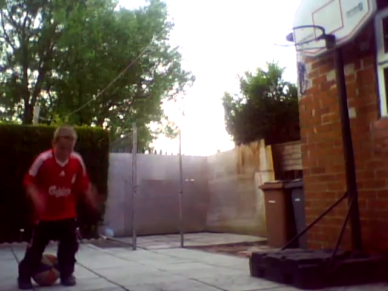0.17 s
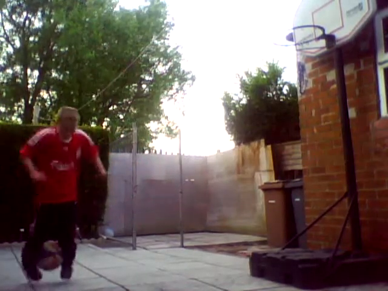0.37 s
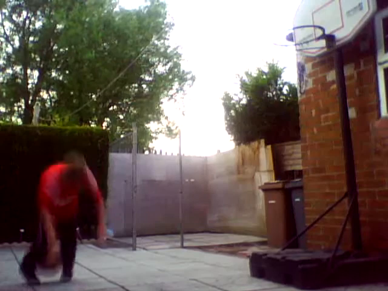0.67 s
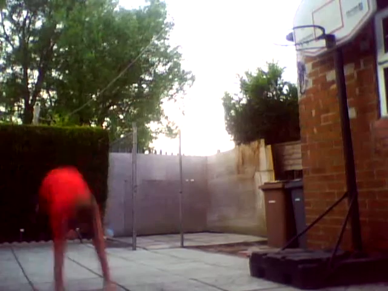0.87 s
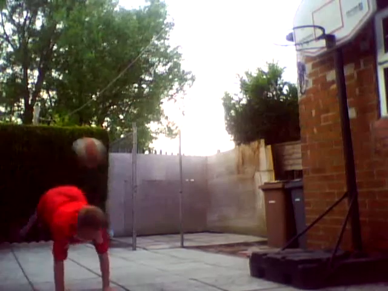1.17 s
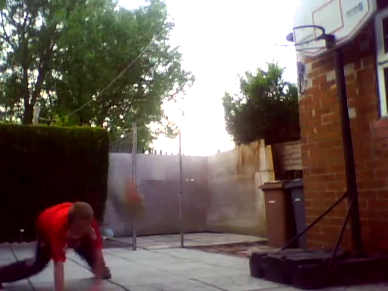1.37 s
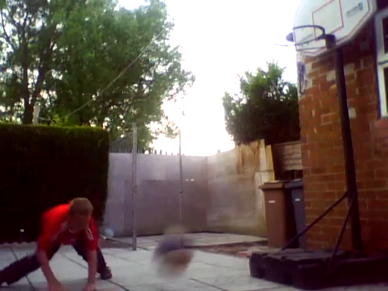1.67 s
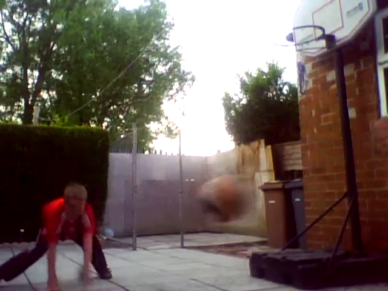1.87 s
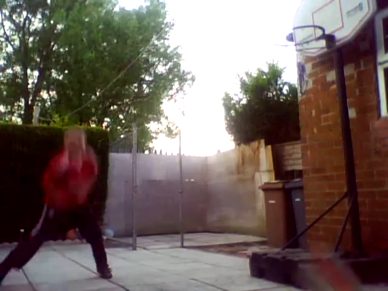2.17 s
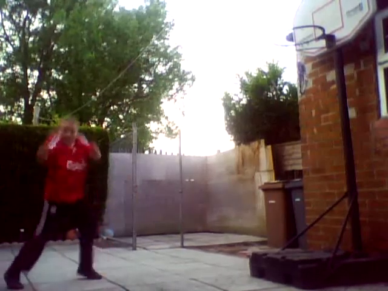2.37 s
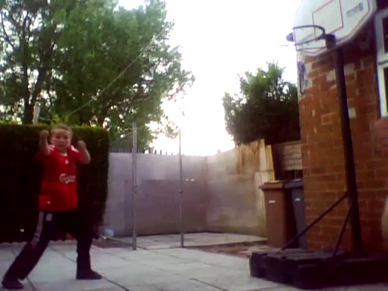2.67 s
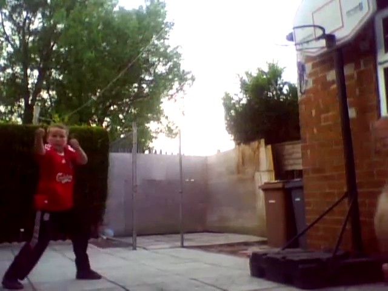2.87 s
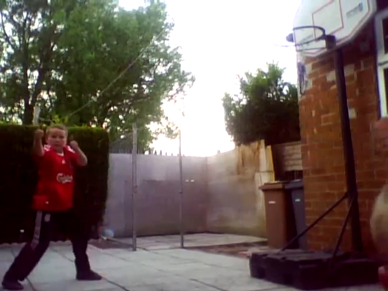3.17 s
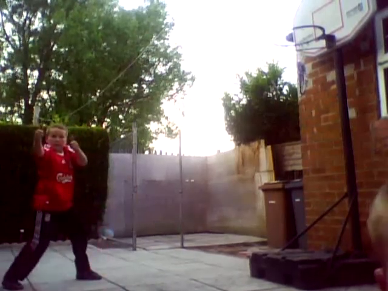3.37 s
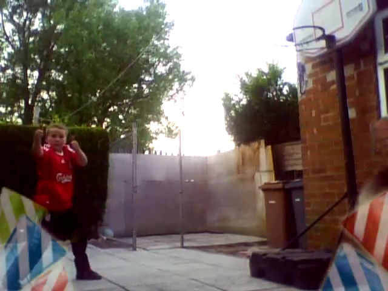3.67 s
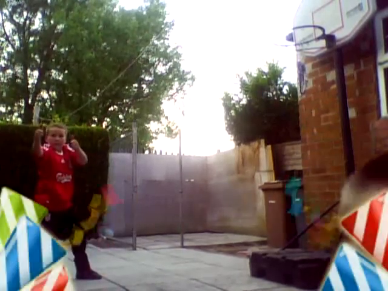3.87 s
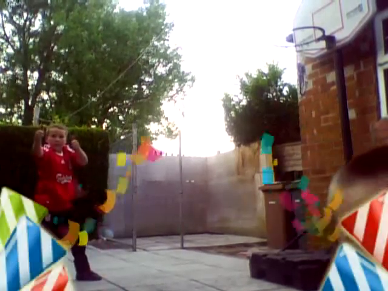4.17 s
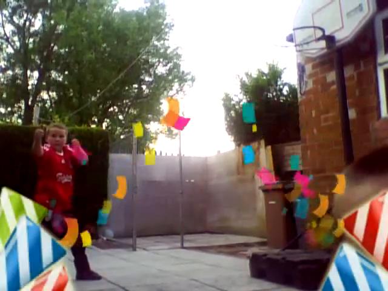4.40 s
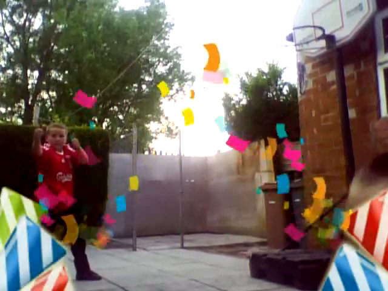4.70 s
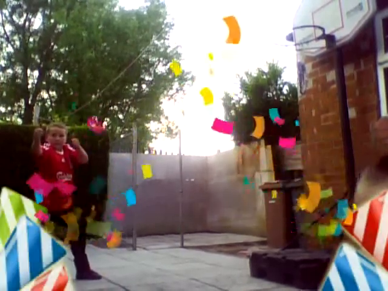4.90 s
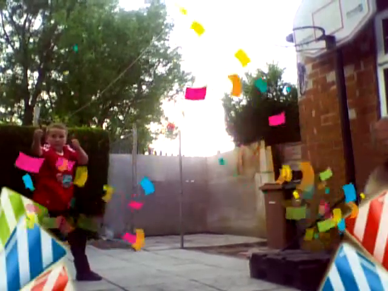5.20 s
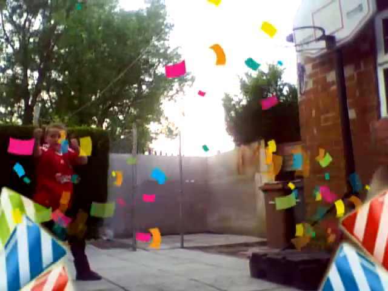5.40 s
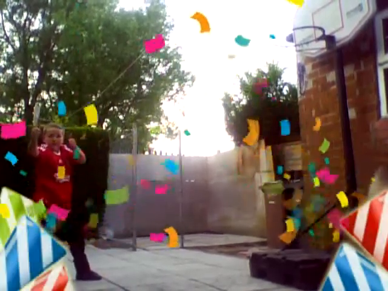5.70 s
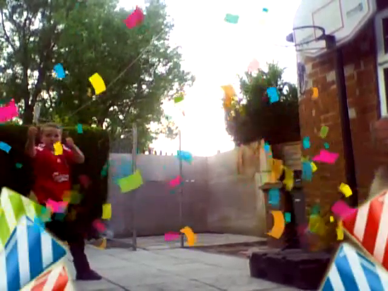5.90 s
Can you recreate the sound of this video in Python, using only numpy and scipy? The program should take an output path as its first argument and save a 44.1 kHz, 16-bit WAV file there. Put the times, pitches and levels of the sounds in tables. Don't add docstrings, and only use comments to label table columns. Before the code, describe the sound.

Irregular impacts on stone slabs: hand slaps and shoe landings first, then strong ball bounces with a ringing slap and low boom, later weaker bounces and faint shuffles. Short yard echoes are chopped off quickly. A cheap microphone near the ground picks up constant disk hum, thin hiss, slow air drift and gritty little buzzes.

```python
import sys
import numpy as np
from scipy import signal
from scipy.fft import rfft, irfft
from scipy.io import wavfile
from scipy.ndimage import uniform_filter1d

SR = 44100
rng = np.random.default_rng(int(sys.argv[2]) if len(sys.argv) > 2 else 0)


def volts_from_db(level):
    exponent = np.asarray(level, float) / 20
    return 10 ** exponent


def wrap_up_sound(samples):
    columns = np.atleast_2d(samples).T
    tamed = np.clip(columns, -1, 1)
    steps = np.round(tamed * 32767).astype(np.int16)
    wavfile.write(sys.argv[1], SR, steps)


N = 266628
SPAN = 8192

# (time [s], peak [dB], slap [dB rel], yard t60 [s], gate open [s])
BALL = [(1.731, -38, -6.5, 0.32, .13), (2.398, -39, -12.5, 0.26, 0.087), (2.922, -44, -22, 0.41, 0.038),
        (3.778, -45.5, -37, 0.13, 0.039), (4.049, -60.5, -21, 0.17, 0.074), (4.28, -56, -60, .12, 0.014),
        (4.294, -59, -40, 0.17, 0.023), (4.337, -55, -20, 0.23, 0.022), (4.461, -63.5, -24, .06, 0.018),
        (4.978, -62, -14, 0.27, 0.014)]
# (time [s], peak [dB], slap [dB rel], yard t60 [s], gate open [s])
LIMBS = [(1.062, -48.5, 2.5, 0.21, 0.074), (1.397, -48.5, -15, 0.26, 0.052),
         (3.347, -44.5, -14.5, 0.17, .055), (3.571, -65, -29, 0.22, 0.069)]
# (time [s], peak [dB], slap [dB rel], yard t60 [s], gate open [s])
HANDS = [(.695, -70, -18, 0.14, 0.053), (.788, -54.5, -6, 1.3, 0.072), (1.43, -40.5, -14.5, 0.19, 0.094),
         (2.54, -50.5, -25, 0.25, 0.046)]


def unit(x):
    return x / np.sqrt(np.mean(x ** 2) + 1e-30)


def colour(x, tone, boom_db=0., slap_db=0.):
    hz = np.maximum(np.arange(len(x) // 2 + 1) * SR / len(x), 1)
    point_hz, point_db = np.array(tone).T
    db = np.interp(np.log(hz), np.log(point_hz), point_db, left=-90, right=-90)
    boom_shelf = boom_db / (1 + (hz / 420) ** 4)
    slap_shelf = slap_db / (1 + (2800 / hz) ** 6)
    middle = (hz > 300) & (hz < 2500)
    norm = np.sqrt(np.mean(volts_from_db(db)[middle] ** 2) / 10)
    return irfft(rfft(x) * volts_from_db(db + boom_shelf + slap_shelf) / norm, len(x))


def walk(rate_hz):
    k = int(SR / rate_hz)
    held = np.repeat(rng.standard_normal(N // k + 1), k)
    return 0.73 * uniform_filter1d(uniform_filter1d(held, k), k)[:N]


def smooth(size):
    size = int(size)
    noise = rng.standard_normal(SPAN)
    return unit(uniform_filter1d(uniform_filter1d(noise, size), size))


def gate(t, open_s):
    close_s = 0.0028 + 0.045 * open_s
    return 1 / (1 + np.exp(np.clip((t - open_s) / close_s, -50, 50)))


def fade(t, t60):
    return np.exp(-np.log(1000) * t / t60)


def add(out, s, x):
    i = int(s * SR)
    out[i:i + len(x)] += x[:N - i]


def laptop():
    # (frequency [Hz], density [dB per Hz])
    hiss_tone = [(70, -28.5), (130, 3), (300, -5.5), (500, -9), (750, -11), (950, -8.5), (1150, -13.5),
                 (2000, -16), (2500, -26), (4200, -33.5), (5000, -37.5), (7000, -42), (8600, -46.5),
                 (16000, -47.5)]
    # (frequency [Hz], density [dB per Hz])
    drift_tone = [(2, -6), (6, -3), (15, -10.5), (30, -17), (60, -17.5), (120, -29)]
    t = np.arange(N) / SR
    hum_phase = 2 * np.pi * 90.02 * t + 0.15 * walk(5)
    hum = np.sqrt(2) * np.sin(hum_phase) * volts_from_db(-55.5 - 0.25 * t + 0.5 * walk(8))
    hiss_db = -72 + 0.32 * walk(12) + 0.13 * walk(15)
    hiss = unit(colour(rng.standard_normal(N), hiss_tone)) * volts_from_db(hiss_db)
    drift = unit(colour(rng.standard_normal(N), drift_tone)) * volts_from_db(-62 + 2.1 * walk(7.2))
    return hum + hiss + drift


def buzz():
    # (time [s], peak [dB])
    ticks = [(1.113, -85), (1.126, -77), (2.942, -75.5), (3.39, -69.5), (3.396, -74), (3.406, -76),
             (3.419, -87), (4.284, -69), (4.299, -83), (4.367, -79)]
    # (frequency [Hz], density [dB per Hz])
    tick_tone = [(3000, -36), (3750, -11), (4080, 0.5), (4400, -14.5), (5200, -20), (7500, -27),
                 (8050, -10.5), (8500, -28)]
    out, t = np.zeros(N), np.arange(SPAN // 8) / SR
    for s, db in ticks:
        grit = unit(colour(rng.standard_normal(len(t)), tick_tone))
        add(out, s, volts_from_db(db) * grit * fade(t, 0.029) * (1 - np.exp(-t / 0.00019)) ** 2)
    return out


def scuffs():
    # (start [s], length [s], level [dB], rubber pitch [Hz], rise [Hz per s])
    slides = [
        (1.6, 0.16, -81.5, 1994, 6080),
        (2.635, 0.11, -85.5, 2056, 100),
    ]
    # (frequency [Hz], density [dB per Hz])
    grit_tone = [(1200, -7.5), (2200, 2.5), (2700, -5.5), (3300, -19.5), (4100, -5.5), (5000, -39),
                 (6350, -16), (7200, -23)]
    t = np.arange(N) / SR
    grit, hoarse = unit(colour(rng.standard_normal(N), grit_tone)), walk(600)
    uneven = volts_from_db(2.5 * walk(40))
    edge_s, rubber_db = 0.013, 6.5
    out = np.zeros(N)
    for s, length_s, db, hz, rise in slides:
        since = t - s
        level = volts_from_db(db) * gate(-since, edge_s) * gate(since, length_s) * (abs(since) < 0.5)
        rubber = hoarse * np.sin(2 * np.pi * (hz + rise * since / 2) * since)
        out += level * uneven * (grit + volts_from_db(rubber_db) * rubber)
    return out


def thuds():
    # (time [s], peak [dB], frequency [Hz], t60 [s], first swing [+1 up, -1 down])
    knocks = [(1.7312, -19, 140, 0.068, -1), (1.771, -24, 94, 0.08, 1), (2.398, -15, 110, 0.03, -1),
              (3.346, -27, 71, 0.087, -1), (3.369, -21.5, 163, 0.04, 1), (3.78, -25.5, 90, 0.1, -1),
              (4.283, -19.5, 76, 0.02, 1), (4.293, -29.5, 78, 0.039, 1), (4.36, -28, 60.3, 0.024, -1)]
    # (time [s], peak [dB], frequency [Hz], gate open [s], first swing [+1 up, -1 down])
    casing_rings = [(0.795, -46.5, 268, 0.075, 1), (0.81, -47.5, 89.4, 0.053, 1),
                    (1.07, -31, 107.8, 0.078, -1), (1.442, -35, 104, 0.03, 1), (1.49, -46, 102, .04, 1),
                    (1.753, -27, 73.5, 0.024, -1), (1.795, -35.5, 97, 0.051, 1),
                    (2.42, -32.5, 95.2, 0.048, -1), (2.924, -34, 78.5, 0.038, -1),
                    (3.384, -30, 92.8, 0.045, 1), (4.341, -40, 252, 0.022, 1)]
    # (time [s], peak [dB], frequency [Hz])
    faint_thuds = [(1.216, -60.5, 136), (2.545, -54.5, 88), (3.02, -51, 44.6), (3.45, -58.5, 153),
                   (4.052, -62.5, 197), (4.46, -63.5, 157), (3.539, -56.5, 173), (3.602, -58.5, 191.5),
                   (4.519, -66.5, 262), (4.75, -62, 154), (4.979, -59.5, 113), (5.329, -58.5, 111.7),
                   (5.688, -51, 104.6)]
    events = [(s, db, hz, t60, 0.026, swing) for s, db, hz, t60, swing in knocks]
    events += [(s, db, hz, 0.43, open_s, swing) for s, db, hz, open_s, swing in casing_rings]
    events += [(s, db, hz, 0.37, 0.052, -1) for s, db, hz in faint_thuds]
    out, t = np.zeros(N), np.arange(SPAN) / SR
    for s, db, hz, t60, open_s, swing in events:
        wobble = smooth(190) * np.minimum(t * hz, 1)
        phase = 2 * np.pi * hz * t + 0.2 * wobble
        overtone = 0.25 * np.sin(2 * phase) * fade(t, 0.92 * t60)
        ring = np.sin(phase) - overtone + 0.33 * wobble
        push = 1 - np.exp(-t * hz / 0.18)
        add(out, s, np.sign(swing) * volts_from_db(db) * ring * fade(t, t60) * push * gate(t, open_s))
    return out


def step_blows():
    # (time [s], peak [dB], boom [dB rel], gate open [s])
    shuffles = [(1.048, -64, 12.5, 0.043), (3.535, -69, 8.5, 0.099), (3.615, -73, -4, .043),
                (3.679, -74, 2, 0.028), (3.745, -77.5, 10, .014), (4.614, -70.5, 5, 0.015),
                (4.75, -73.5, -6, .037), (5.288, -75.5, 13, 0.011), (5.328, -73, 15.5, 0.019),
                (5.555, -79, 18, 0.04), (5.605, -73, 6, 0.021), (5.673, -83, 11, 0.12)]
    slap_db, t60 = -21.5, 0.38
    return [(s, db, boom_db, slap_db, t60, open_s) for s, db, boom_db, open_s in shuffles]


def ringing(notes, struck, slope):
    rows = []
    for s, db, hz in notes:
        *_, yard_t60, open_s = min(struck, key=lambda row: abs(row[0] - s))
        lag_s = 0.8 / hz
        rows.append((s + lag_s, db, hz, 0.7 * yard_t60 * (1000 / hz) ** slope, 0.82 * open_s))
    return rows


def pings():
    # (time [s], peak [dB], frequency [Hz])
    smacks = [(1.07, -57, 3040), (1.397, -51, 1150), (1.44, -49.5, 3310), (1.733, -38.5, 3380),
              (1.732, -45, 6000), (1.732, -56, 1330), (2.41, -38, 1320), (2.404, -41, 770),
              (2.399, -57, 3340), (3.778, -65, 2100), (2.922, -62, 4100), (3.779, -40.5, 1790),
              (3.779, -53, 5900), (4.08, -57.5, 1400), (4.337, -78, 5500), (4.46, -59.5, 1690),
              (4.461, -82, 5000), (4.979, -56.5, 880), (4.978, -78, 3500)]
    # (time of blow [s], peak [dB], frequency [Hz])
    ball_notes = [(1.731, -40, 370), (1.731, -46.5, 619), (1.731, -55, 867), (2.398, -75.5, 7000),
                  (2.398, -46, 990), (2.922, -45.5, 967), (2.922, -54, 1680), (2.922, -43, 216),
                  (3.778, -41, 193), (3.778, -44.5, 924), (3.778, -73.5, 4120), (4.337, -59.5, 525),
                  (4.337, -54.5, 855), (4.337, -61, 1465), (4.978, -55.5, 269)]
    # (time of blow [s], peak [dB], frequency [Hz])
    body_notes = [(.695, -64, 602), (.79, -54.5, 429), (.79, -59, 778.6), (.79, -63.5, 928.5),
                  (.79, -77.5, 3910), (.79, -75, 3360), (1.062, -59, 3940), (1.397, -60, 280),
                  (1.432, -67, 3400), (2.54, -70, 1510), (1.432, -49, 713), (1.432, -45, 300.5),
                  (1.731, -46.5, 206), (2.922, -47, 391), (2.54, -55, 196), (2.54, -84, 6800),
                  (1.062, -56, 328), (1.062, -61, 2930), (3.347, -46.5, 891), (3.571, -71, 696),
                  (3.615, -70, 1464), (3.615, -75.5, 1820), (3.679, -72, 780), (3.745, -71, 1910)]
    rows = [(s, db, hz, 44 / hz, 0.026) for s, db, hz in smacks]
    rows += ringing(ball_notes, BALL, slope=0.15)
    rows += ringing(body_notes, LIMBS + step_blows() + HANDS + BALL, slope=0.083)
    out, t = np.zeros(N), np.arange(SPAN) / SR
    for s, db, hz, t60, open_s in rows:
        blur = 300 / (1 + (hz / 2500) ** 3)
        rough = volts_from_db(3.6 * smooth(blur) * np.minimum(t / 0.014, 1))
        ring = rough * np.sin(2 * np.pi * hz * t + 0.57 * smooth(blur))
        onset = (1 - np.exp(-t / 0.00028)) ** 2
        add(out, s, volts_from_db(db) * ring * fade(t, t60) * onset * gate(t, open_s))
    return out


def boomed(table, boom_db):
    return [(s, db, boom_db, *rest) for s, db, *rest in table]


def blows(table, tone, crack_db, rise_s, treble):
    out, t = np.zeros(N), np.arange(SPAN) / SR
    dull_sos, mild_sos = (signal.butter(4, hz, fs=SR, output="sos") for hz in (2700, 4800))
    for s, db, boom_db, slap_db, t60, open_s in table:
        noise = colour(rng.standard_normal(SPAN), tone, boom_db, slap_db + 11.5)
        dull, mild = signal.sosfilt(dull_sos, noise), signal.sosfilt(mild_sos, noise)
        echoes = dull * fade(t, t60)
        echoes += (mild - dull) * fade(t, treble * t60)
        echoes += (noise - mild) * fade(t, 0.57 * treble * t60)
        clumps = volts_from_db(1.5 * smooth(230))
        crack = volts_from_db(crack_db) * noise * fade(t, 0.0072)
        contact = (1 - np.exp(-t / rise_s)) ** 2
        add(out, s, volts_from_db(db) * (echoes * clumps + crack) * contact * gate(t, open_s))
    return out


def feet():
    # (frequency [Hz], density [dB per Hz])
    limb_tone = [(140, -18.5), (230, -1), (329, -7.5), (478, -13.5), (598, -10.5), (1320, -14.5),
                 (1510, -16), (2740, -25), (3750, -23.5), (4830, -47), (6320, -43), (8150, -59),
                 (10600, -72), (17900, -120)]
    landings = boomed(LIMBS, -0.6) + step_blows()
    return blows(landings, limb_tone, crack_db=-0.5, rise_s=0.0005, treble=0.74)


def hands():
    # (frequency [Hz], density [dB per Hz])
    hand_tone = [(140, -22), (230, -1.5), (500, -8.5), (1010, -11), (1400, -22), (2000, -28), (2400, -31.5),
                 (2780, -35.5), (3690, -22.5), (4980, -46.5), (6610, -45.5), (8150, -64), (10600, -104),
                 (17900, -120)]
    return blows(boomed(HANDS, -4), hand_tone, crack_db=-5.5, rise_s=0.0016, treble=0.43)


def ball():
    # (frequency [Hz], density [dB per Hz])
    ball_tone = [(140, -25), (230, 0.5), (507, -16), (936, -15), (1150, -23), (1360, -19.5), (1970, -27.5),
                 (2290, -28), (2700, -37), (3480, -38.5), (4620, -50), (6510, -43), (8150, -66.5),
                 (10600, -101), (17900, -120)]
    return blows(boomed(BALL, -6.5), ball_tone, crack_db=11.5, rise_s=0.00042, treble=0.75)


def scene():
    yard = buzz() + scuffs() + thuds() + pings() + feet() + hands() + ball()
    mic = signal.butter(10, 8500, fs=SR, output="sos")
    return (laptop() + signal.sosfiltfilt(mic, yard))[None]


def top_cut(x):
    return signal.sosfilt(signal.butter(12, 15500, fs=SR, output="sos"), x)


def record(dry):
    return top_cut(dry)


dry = scene()
out = record(dry)
wrap_up_sound(out)
```